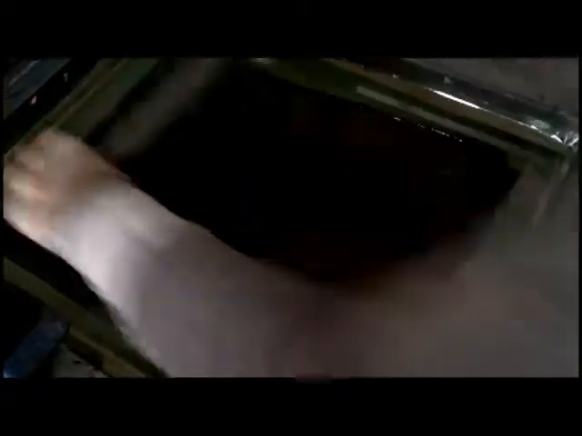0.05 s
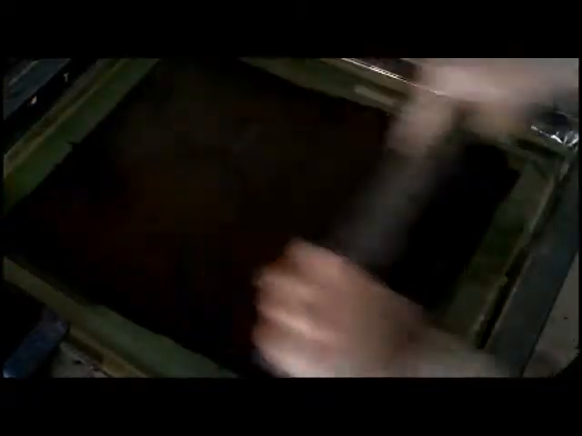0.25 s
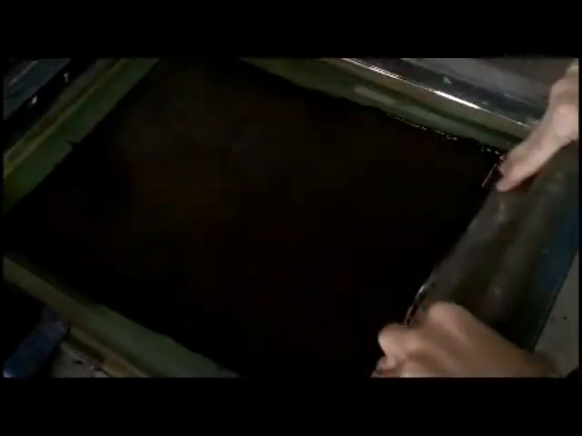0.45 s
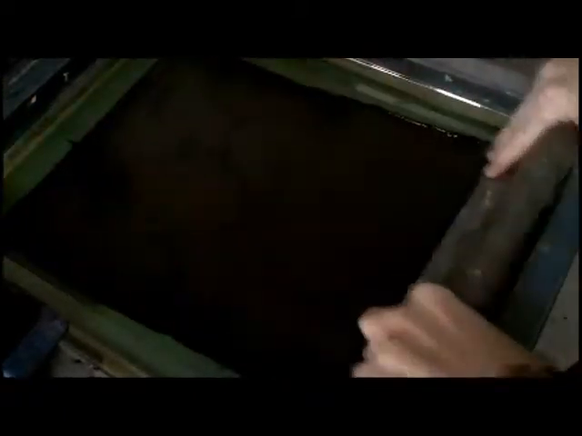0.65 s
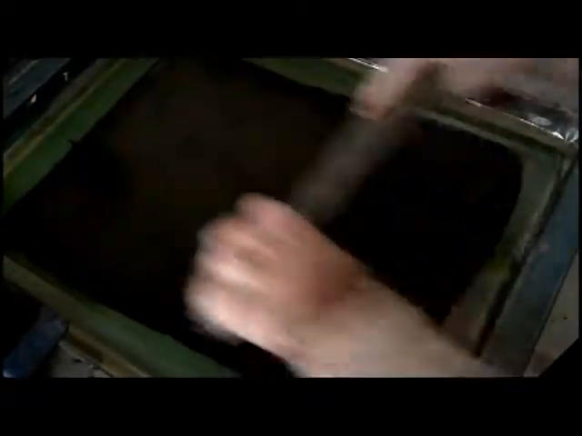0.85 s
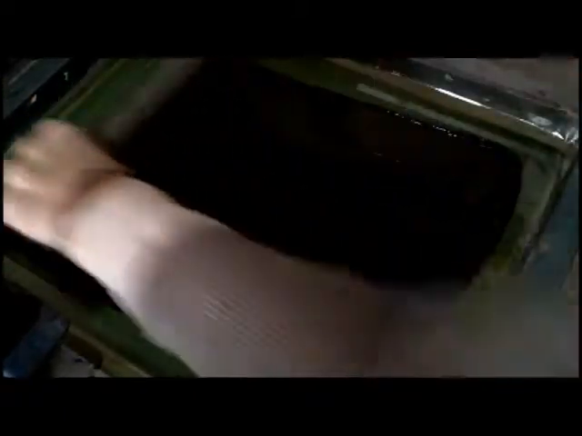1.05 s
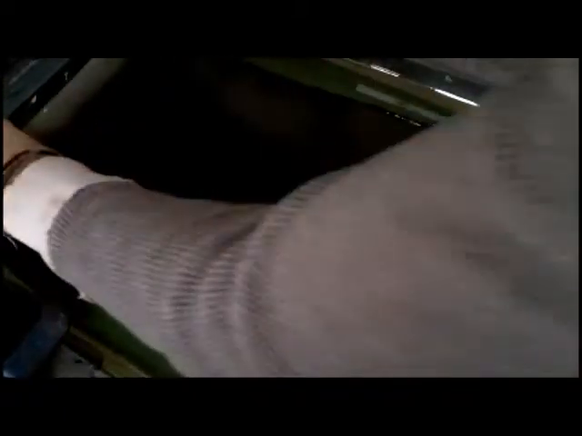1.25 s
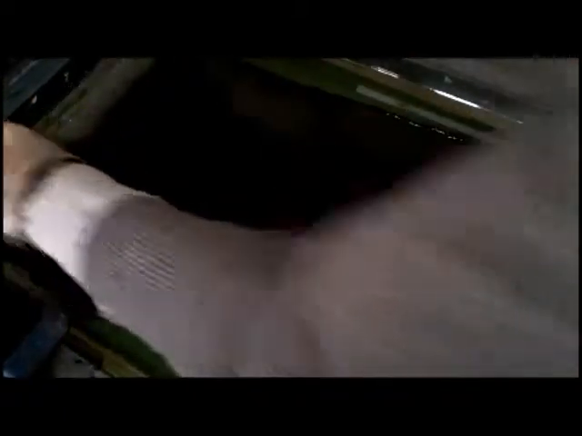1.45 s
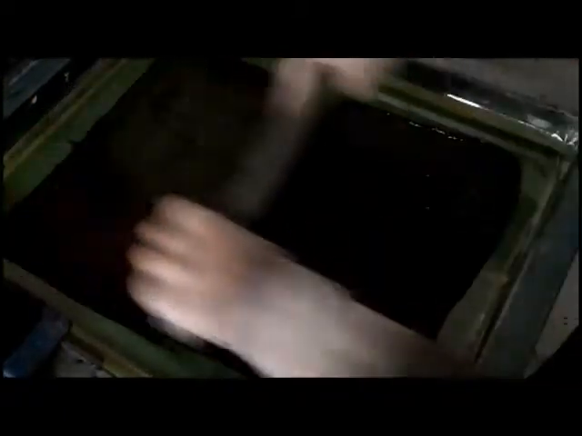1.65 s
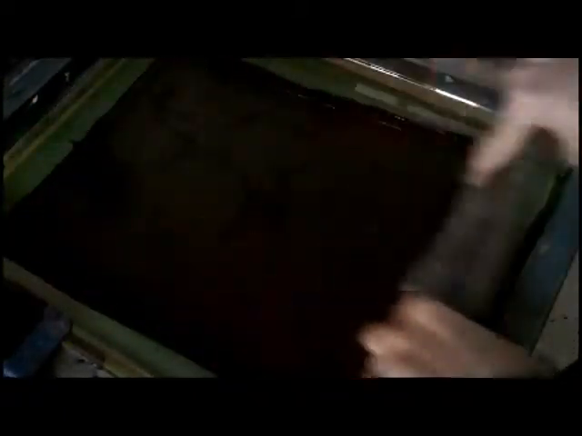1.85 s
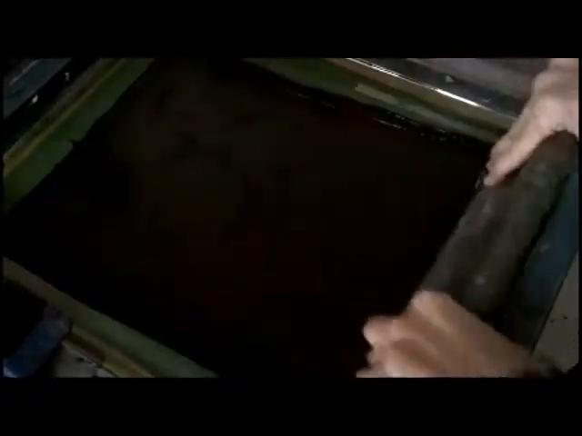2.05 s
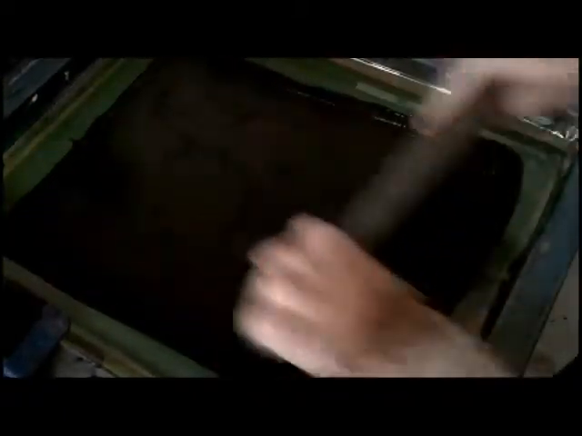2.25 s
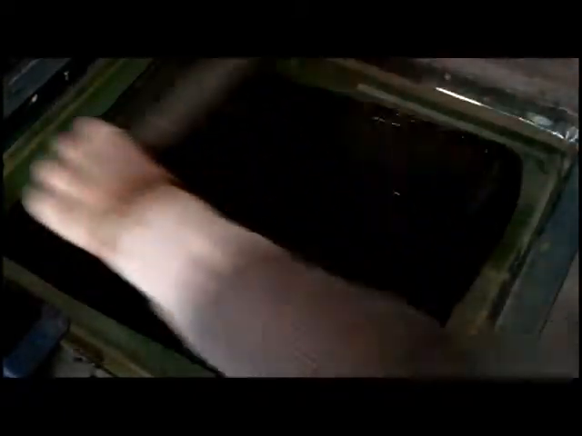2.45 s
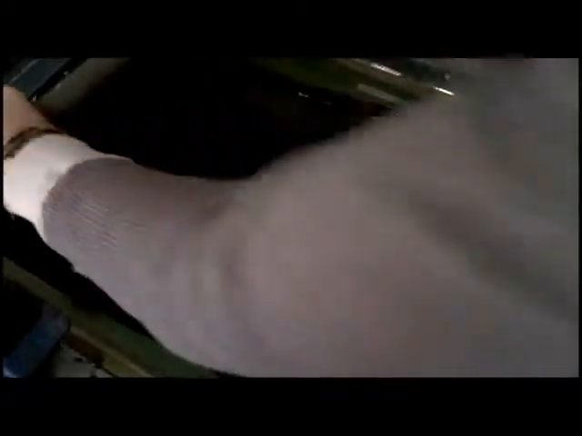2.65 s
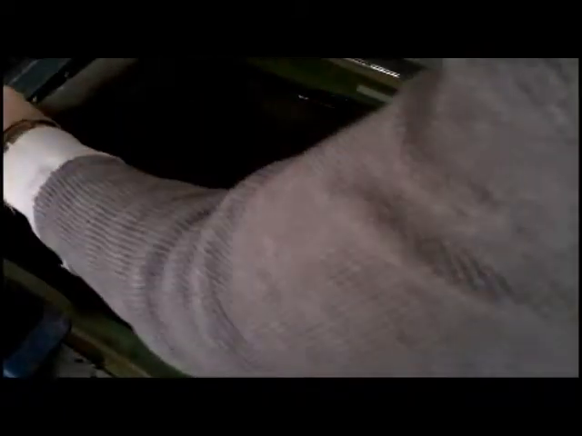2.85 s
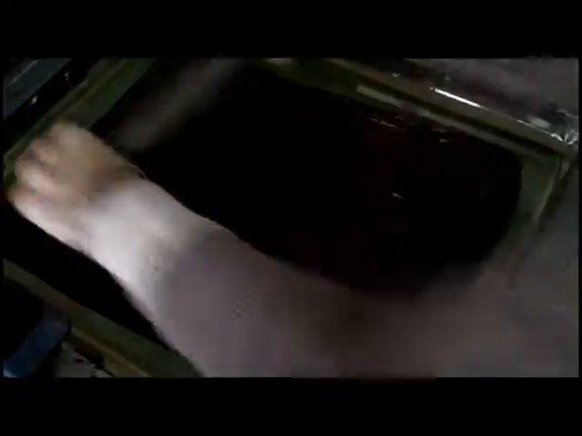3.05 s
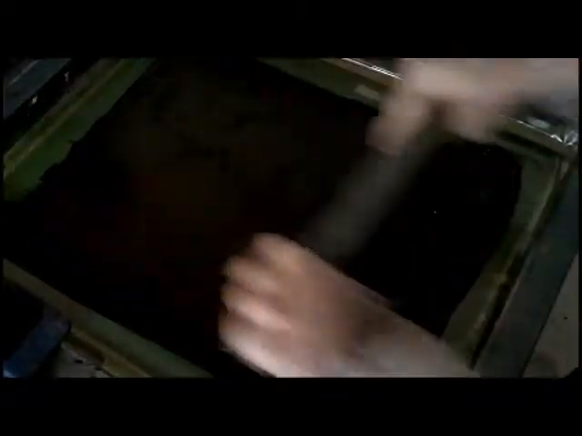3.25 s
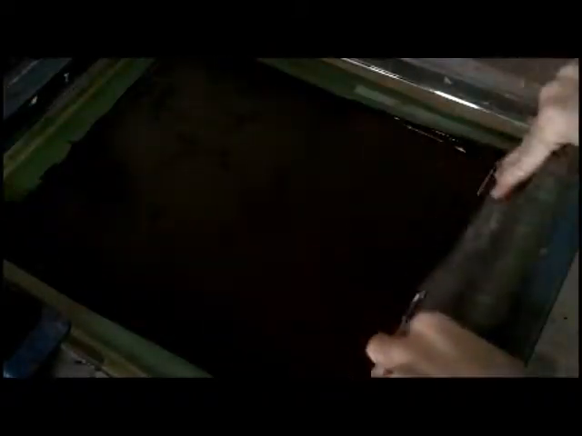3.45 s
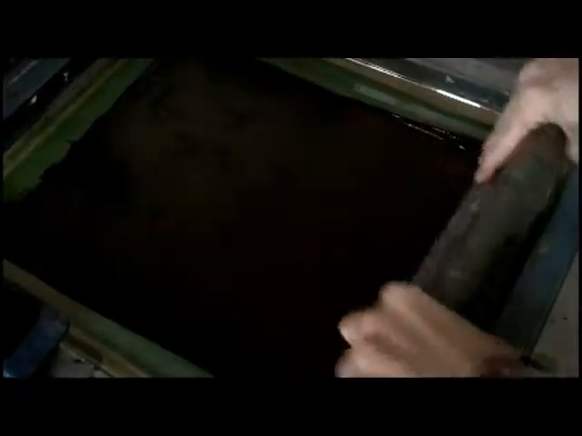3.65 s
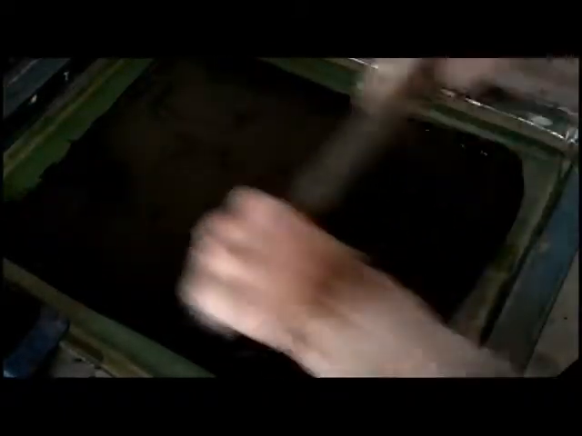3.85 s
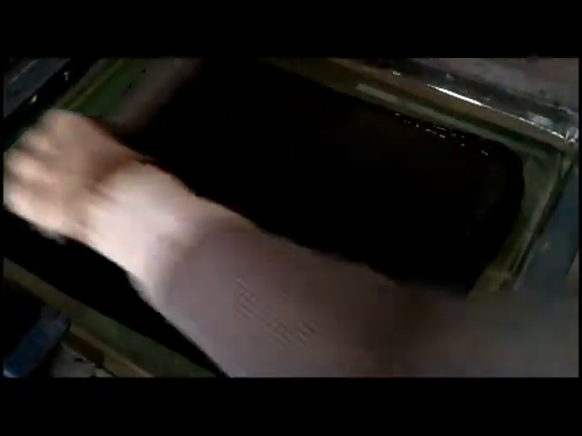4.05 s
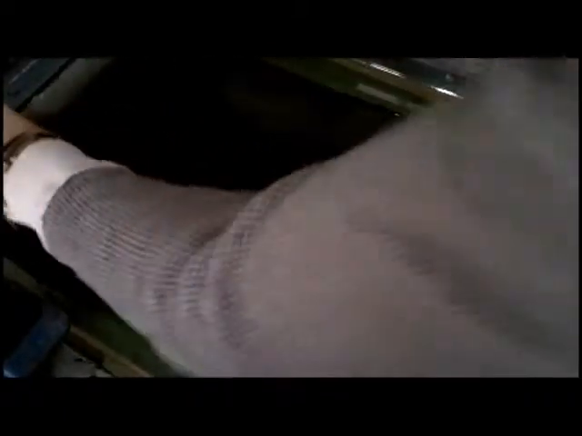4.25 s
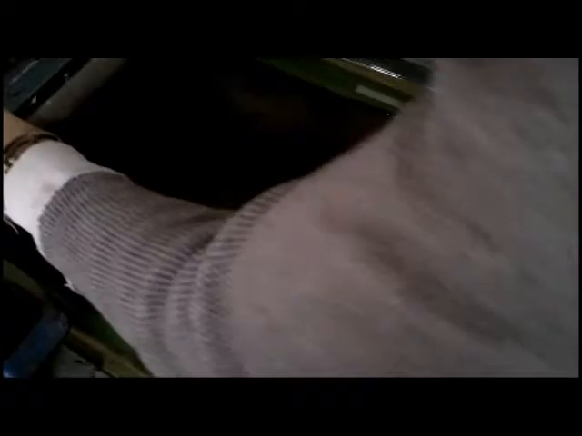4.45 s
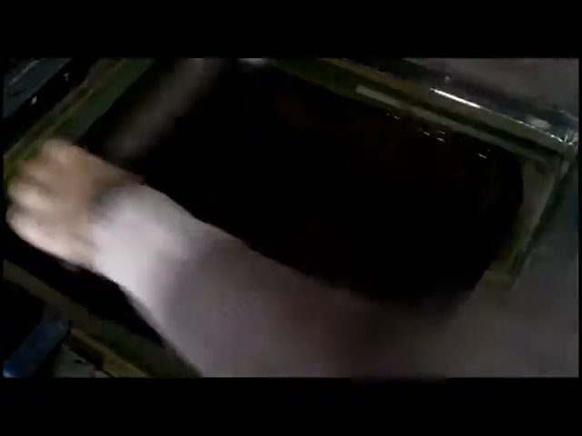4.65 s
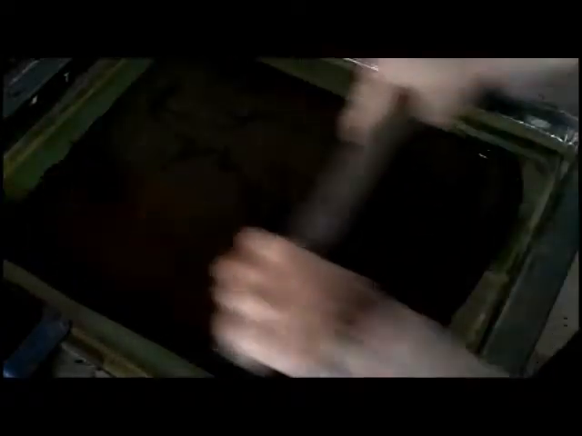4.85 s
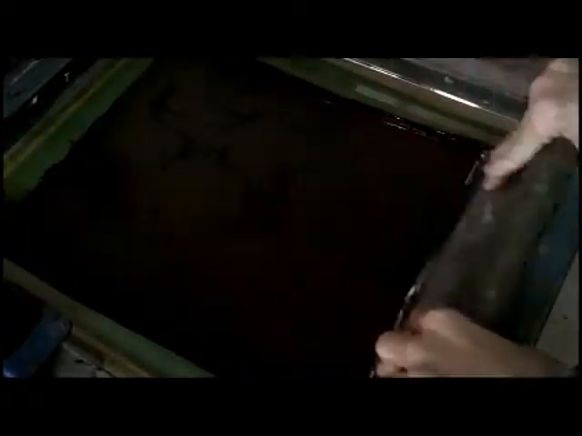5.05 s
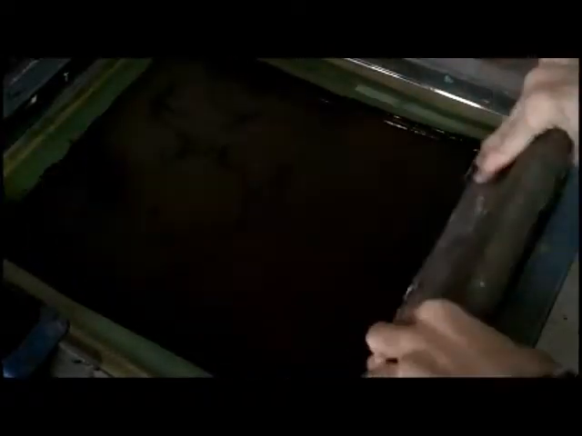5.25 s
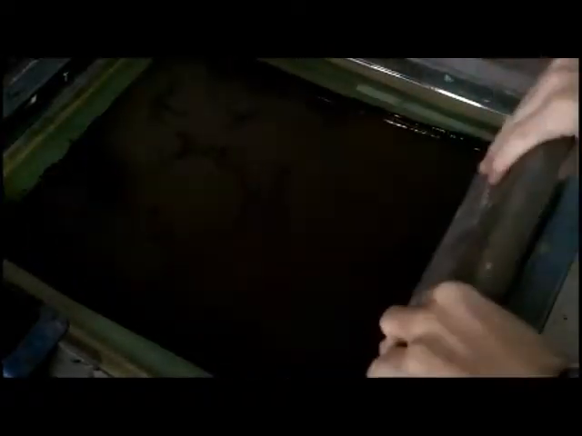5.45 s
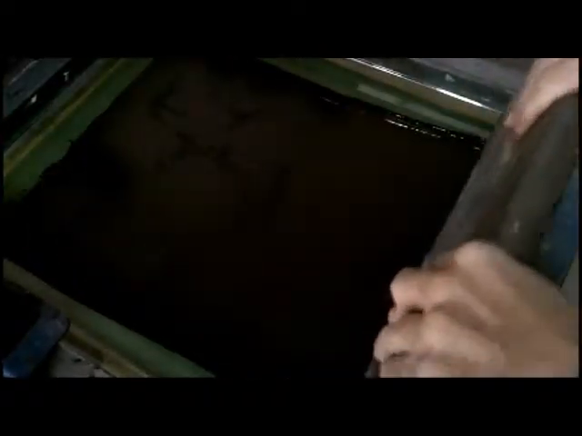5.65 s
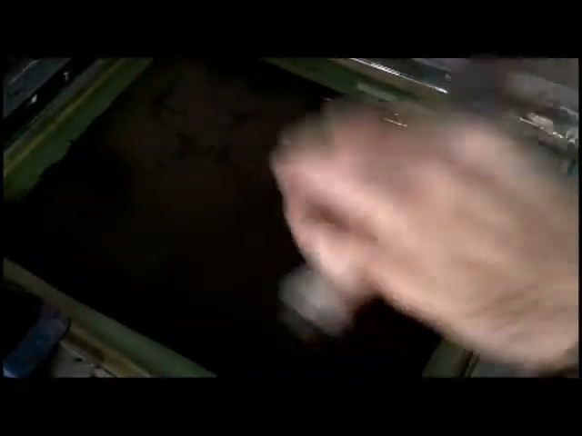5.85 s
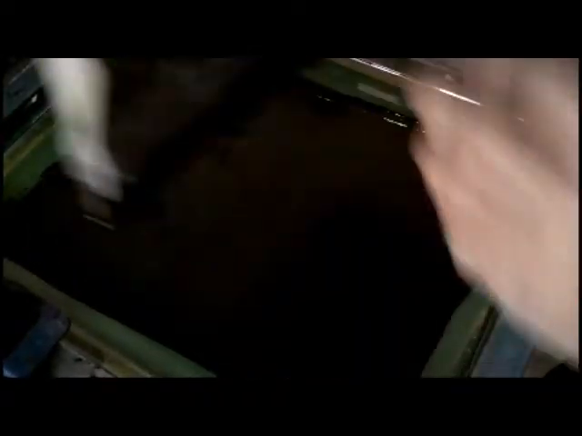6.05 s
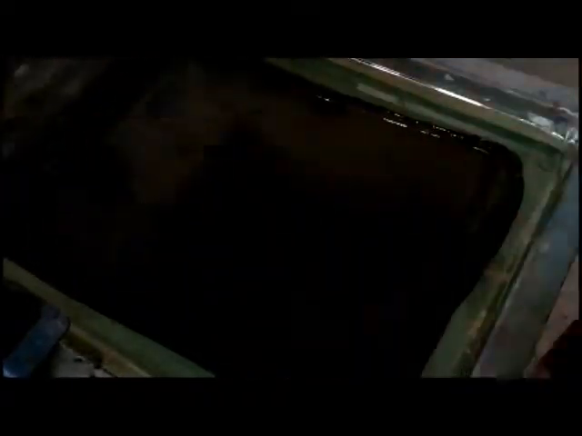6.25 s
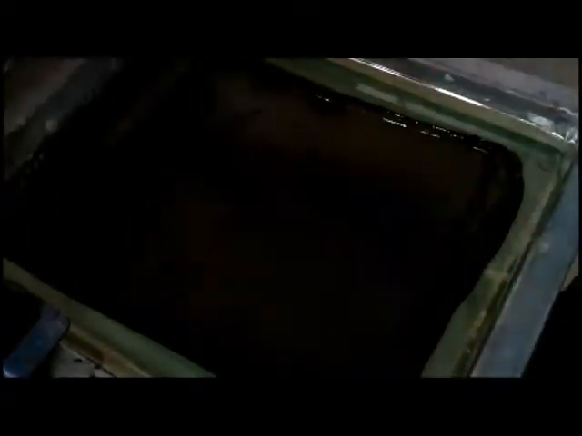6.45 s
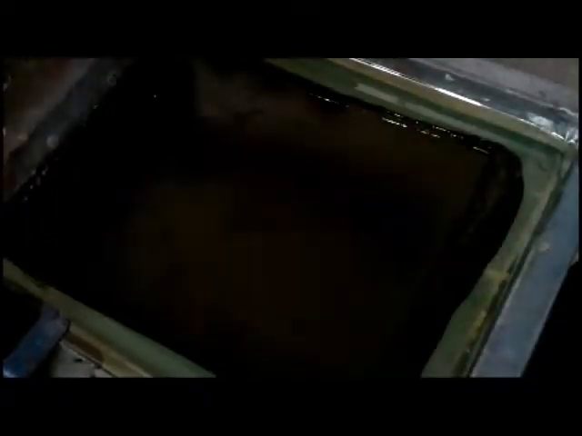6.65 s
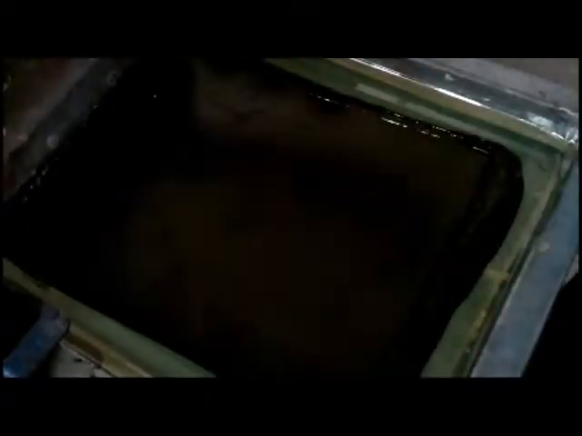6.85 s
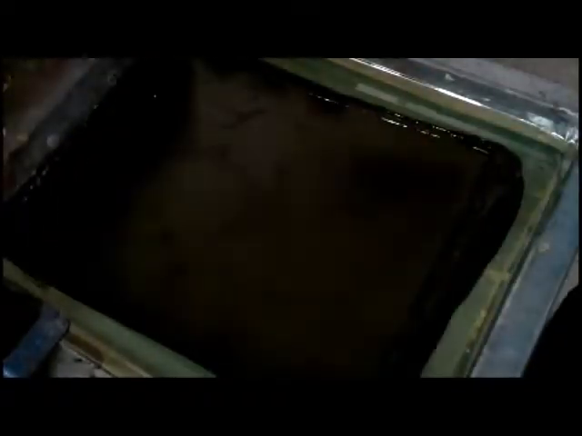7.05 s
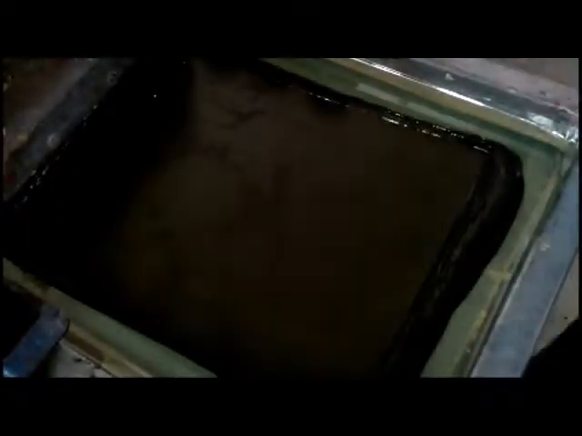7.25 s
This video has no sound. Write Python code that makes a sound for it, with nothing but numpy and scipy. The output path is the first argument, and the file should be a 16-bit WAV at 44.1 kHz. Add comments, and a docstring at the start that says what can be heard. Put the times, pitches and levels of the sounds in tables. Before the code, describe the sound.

Right at the start a rubber squeegee knocks on a wooden frame and is pulled across a taut mesh screen for half a second. It makes a high, zipping whistle that glides up and back down over a gritty scrape and a low drumming of the mesh. Three more pulls follow at about 1.5, 3.0 and 4.6 seconds. Each starts with a knock, and each is preceded by a hollow thump as the blade lands, at about 1.3, 2.8 and 4.4 seconds. In the gaps, sticky ink ticks and pops faintly and hands brush the screen. After 5.2 seconds only light rubbing and small ticks remain. A softer knock comes at 6.7 seconds and a very faint, short squeak at 7.2. Everything is close, with slight room echo and a low, steady hum throughout.

```python
"""A rubber squeegee lands on a printing screen, knocks the wooden frame and is pulled across the mesh.
The blade ticks over the threads so fast that it sings a gliding whistle over a scrape; the taut mesh drums.
Sticky ink then ticks and pops, and hands brush the screen. Three more pulls follow at 1.5, 3.0 and 4.6 s,
each after a knock. The blade lands again at 6.7 s and slips briefly at 7.2 s. The room hums throughout."""
import sys
import numpy as np
from scipy import signal
from scipy.fft import rfft, irfft, next_fast_len
from scipy.io import wavfile
from scipy.ndimage import uniform_filter1d, map_coordinates

SR = 44100
rng = np.random.default_rng(int(sys.argv[2]) if len(sys.argv) > 2 else 0)


def generate_wav(signal):
    """Clip the signal to [-1, 1] and save it as 16-bit WAV at the path in sys.argv[1]."""
    frames = np.transpose(np.atleast_2d(signal))
    scaled = np.clip(frames, -1, 1) * 32767
    pcm = np.round(scaled).astype(np.int16)
    wavfile.write(sys.argv[1], SR, pcm)


N = 322429

# blade path, one list per pull, the slip last: time_s, thread_rate_hz, skew_ratio, whistle_db, weave_db
PULLS = [
    [(.055, 1115, 0.04, -30, -50), (.09, 3550, .03, -27, -34.5), (.115, 5110, 0.01, -22, -42),
     (.15, 6790, 0.06, -19, -39.5), (.2, 8840, 0.01, -23.5, -33), (.24, 9600, .04, -16.5, -32),
     (.285, 10430, 0.06, -24, -37.5), (.375, 10000, 0.07, -15, -35), (.405, 8080, 0.03, -19, -43),
     (.443, 4604, 0.01, -28, -45), (.46, 3743, 0.06, -28, -46), (.48, 3760, 0.1, -27.5, -54),
     (.495, 3973, 0.01, -23, -50), (.512, 2996, 0.03, -32.5, -51), (.545, 815, .02, -51, -60)],
    [(1.515, 1203, .1, -46, -52), (1.55, 2300, .05, -45, -56), (1.585, 4196, .03, -34.5, -46),
     (1.62, 5570, 0.03, -26, -46), (1.655, 7440, 0.05, -29.5, -35), (1.76, 9560, .03, -25.5, -37),
     (1.8, 9870, 0.06, -28, -38), (1.84, 9350, 0.01, -32, -36.5), (1.87, 9790, 0.02, -29, -37.5),
     (1.9, 8506, .08, -27, -44), (1.93, 7254, .1, -37, -42), (1.965, 5590, 0.04, -31, -42),
     (2.0, 3286, 0.01, -39, -50), (2.03, 1506, 0.05, -54, -43)],
    [(3.025, 1005, .05, -45, -56), (3.065, 3640, 0, -32.5, -40), (3.09, 4800, 0.03, -24, -42),
     (3.12, 5730, 0.03, -34, -37), (3.17, 6350, 0.01, -26, -42.5), (3.25, 8340, 0.11, -28.5, -35),
     (3.3, 8550, .11, -23, -39.5), (3.34, 8570, 0.15, -31, -38), (3.39, 9360, 0.12, -23, -40),
     (3.44, 7010, 0.11, -30, -47), (3.48, 5400, 0.04, -30, -40), (3.505, 3365, 0.04, -44, -45.5),
     (3.55, 2400, 0.12, -46, -54), (3.585, 900, .05, -49, -54)],
    [(4.625, 894, .05, -32, -55), (4.64, 2218, 0, -27.5, -46), (4.66, 3820, 0.05, -24.5, -35),
     (4.717, 4905, 0, -19.5, -41), (4.73, 5200, 0.02, -24, -40), (4.77, 7055, 0.04, -28.5, -48),
     (4.82, 6750, 0, -18.5, -46), (4.86, 7750, 0.01, -27, -44), (4.905, 8600, 0.11, -22, -36.5),
     (4.95, 7575, 0.03, -33, -37.5), (5.01, 8510, .05, -26.5, -43), (5.05, 7645, 0.03, -34, -43),
     (5.09, 7700, 0.01, -27, -48), (5.12, 4513, .02, -29, -47), (5.145, 1800, 0.03, -58, -62)],
    [(7.245, 3710, .04, -62.5, -80), (7.27, 3880, .06, -53, -75), (7.31, 3800, 0.04, -59, -77)],
]
# whistle overtones: thread_rate_multiple, relative_db
OVERTONES = [(1.5, -9.5), (2, -9)]
# blade pressure per pull: start_s, stop_s, scrape_db, drum_db, hiss_db
GRIPS = [(.055, 0.508, -38.5, -41.5, -36.5), (1.54, 1.976, -42, -43, -37), (3.028, 3.524, -42, -45, -38),
         (4.625, 5.115, -41, -43.5, -37), (7.245, 7.29, -59, -62, -51.5)]
# decay after a pull: scrape_t60_s, drum_t60_s, hiss_t60_s
RELEASE_T60_S = (0.29, 0.48, 0.21)
# blade landings: start_s, scrape_db, drum_db, sway_db, shudder_db
LANDINGS = [(.056, -50, -31.5, -59, -40), (1.301, -48, -35.5, -38, -33.5), (1.54, -52, -38, -62, -41),
            (2.782, -57, -34, -28, -46), (3.03, -43, -33, -57, -43), (4.357, -56, -38.5, -31, -44),
            (4.627, -43, -31.5, -60, -40), (6.693, -62, -44.5, -44, -40)]
# decay after a landing: scrape_t60_s, drum_t60_s, hiss_t60_s, sway_t60_s
LANDING_T60_S = (.4, .5, .4, 0.46)
# light touches of hands, sleeves and blade: centre_s, length_s, scrape_db, drum_db, sway_db
BRUSHES = [(0.674, .08, -58.5, -61, -49), (0.769, 0.088, -59, -51.5, -58), (0.848, 0.073, -77, -66, -44.5),
           (1.038, .2, -69, -58, -54), (2.076, .08, -74, -50, -65), (2.151, .07, -53.5, -54, -65),
           (2.254, 0.42, -57.5, -51.5, -52), (2.518, 0.036, -59.5, -55, -67), (2.864, .12, -59, -46.5, -52),
           (3.694, 0.076, -59.5, -58, -55), (3.788, 0.13, -60, -47, -60), (3.957, 0.072, -69, -56.5, -54),
           (5.376, 0.2, -64, -52, -60), (5.476, 0.19, -52, -50.5, -57), (5.924, 0.13, -57.5, -65.5, -61),
           (6.64, 0.13, -72, -66, -62.5), (6.75, 0.057, -55.5, -53, -54), (6.837, 0.088, -63, -55, -62),
           (7.134, 0.19, -67.5, -64.5, -43), (7.26, 0.12, -72, -64, -54)]
# floor between touches: scrape_db, drum_db, hiss_db, sway_db
REST_DB = (-74.5, -63.5, -59.5, -64.5)
# noise spectra of scrape, hiss, table sway and room air: freq_hz, density_db
SCRAPE_SPECTRUM = [(500, -28), (800, 1.5), (1300, -6.5), (1800, 0), (3000, 3.5), (5600, 5.5), (6200, -40)]
HISS_SPECTRUM = [(5000, -34.5), (5800, 0), (8000, 1), (12000, 1)]
SWAY_SPECTRUM = [(10, -4.5), (25, 0.5), (50, -6.5), (90, -33)]
ROOM_SPECTRUM = [(12, -39.5), (20, 5.5), (71, -1), (92, -6.5), (124, 1.5), (154, -20), (208, 0),
                 (287, -24.5), (396, -14.5), (2400, -28.5), (3120, -77), (5280, -120)]
# resonances of the taut mesh and the wooden frame: freq_hz, width_hz, gain_db
MESH_MODES = [(162, 80, -4), (288.7, 53, 3.5), (403, 167, -7), (816, 990, -36)]
FRAME_MODES = [(40, 19, -9), (121.5, 23, -1), (181, 34.9, 2), (314, 102, 3.5), (407, 123, 1.5),
               (629, 180, -5.5), (1624, 600, -25.5)]
# blows on the frame: start_s, level_db, crack_relative_db
KNOCKS = [(0.052, -34, -4), (0.055, -27, -10), (0.992, -47.5, -6), (1.283, -36, -31), (1.3, -26.5, -37),
          (1.307, -35, -26), (1.311, -30, -30), (1.318, -25, -23), (1.378, -35.5, -12.5),
          (1.514, -35.5, -22), (1.542, -24.5, -19), (1.703, -32, -28), (1.715, -29, -28), (1.989, -43.5, 6),
          (2.741, -39, -18), (2.781, -21.5, -26), (2.794, -15.5, -28.5), (3.01, -36.5, -31),
          (3.025, -25, -31), (3.039, -24.5, -3.5), (4.339, -44.5, -5), (4.352, -30.5, -12),
          (4.36, -38, -20), (4.367, -21.5, -37), (4.624, -25, -8), (4.632, -18, -14.5), (6.69, -31.5, -21),
          (6.719, -37, -23)]
# ink letting go: start_s, level_db
INK_TICKS = [(0.7572, -48.5), (0.8579, -54), (1.0281, -50), (1.273, -48), (2.1156, -43), (2.5172, -45),
             (2.6409, -52), (2.7526, -46.5), (2.7656, -45), (2.8764, -47), (3.9514, -52.5), (4.5955, -52.5),
             (5.1731, -43), (5.3023, -61), (5.8621, -57), (6.0676, -61), (6.4852, -56.5), (6.6263, -56.5),
             (6.8144, -50), (7.1127, -59), (7.2489, -62)]
# air pockets in the ink: start_s, level_db, pitch_hz
INK_POPS = [(0.78, -47, 693), (1.993, -43.5, 621), (2.075, -53, 719), (2.167, -55, 680), (2.265, -56, 680),
            (3.79, -48, 643)]
# room decay: freq_hz, t60_s
WALL_DECAY = [(100, 0.41), (1000, 0.47), (4000, 0.37), (10000, .18)]
# room hum: pitch_hz, level_db
HUM_LINES = [(70.0, -70.5), (118.4, -74.5), (209.9, -89), (398.4, -81)]
# microphone colour: freq_hz, gain_db
MIC_RESPONSE = [(20, -13.5), (1000, -8.5), (2300, -6.5), (3000, -5), (3800, -1), (4600, 1.5), (4950, -1.5),
                (5150, -12.5), (6900, -20.5), (8300, -22), (10000, -21), (10700, -30), (11300, -23),
                (12000, -39.5)]
CODER_DIPS = [(2702, 700), (5520, 460), (7870, 1800), (10960, 590)]

ENDS_HZ = 3810  # below this thread rate only the blade's ends sing; above it the middle takes over
DRAG_HZ, SCRAPE_DB_PER_KHZ, DRUM_DB_PER_KHZ = 4020, -1, 1.03  # level slopes above this thread rate
BITE_S, HISS_BITE_S = .006, 0.028
LIGHT_HISS_DB = 3  # over the scrape, in landings and brushes
SHUDDER_T60_S, SHUDDER_CUTOFF_HZ = .3, 260
TREBLE_CUTOFF_HZ = 11930


def whistle():
    """The edge crosses threads at a rate set by its speed; the over-under weave adds half that rate."""
    out = np.zeros(N)
    for pull in PULLS:
        time_s, *columns = np.transpose(pull)
        span = np.arange(round(time_s[0] * SR), round(time_s[-1] * SR))
        curves = [uniform_filter1d(np.interp(span / SR, time_s, c), size=300) for c in columns]
        rate_hz, skew, whistle_db, weave_db = curves
        ends_share = np.clip((ENDS_HZ / rate_hz) ** 2.5, 0, 1)
        tone = np.sqrt(1 - ends_share) * fuzzy_tone(rate_hz, 300)
        tone += np.sqrt(ends_share) * blade_ends(rate_hz, skew)
        tone += sum(amp(db) * fuzzy_tone(multiple * rate_hz, 800) for multiple, db in OVERTONES)
        weave = blade_ends(rate_hz / 2, skew) + 2.6 * skew * fuzzy_tone(rate_hz / 2, 500, steady=0)
        fade = signal.windows.tukey(len(span), .03)
        out[span] += fade * (amp(whistle_db) * tone + amp(weave_db) * weave)
    return out


def blade_ends(hz, skew):
    """A skewed blade moves faster under one hand than the other, splitting the tone in two."""
    return (fuzzy_tone(hz * (1 - skew), 250) + fuzzy_tone(hz * (1 + skew), 250)) / np.sqrt(2)


def friction(scrape_gain, hiss_gain):
    """Rubber and hands on mesh: a gritty scrape and a fine hiss under an ever-changing grip."""
    grit = wobble(60) + 0.96 * wobble(300)
    scrape = scrape_gain * unit_rms(amp(2.6 * grit) * noise(SCRAPE_SPECTRUM))
    hiss = hiss_gain * unit_rms(amp(1.2 * grit) * noise(HISS_SPECTRUM))
    return scrape + hiss


def mesh_drum():
    """The rubbed mesh drones; the free part ahead of the blade shortens, so its note climbs."""
    rub = amp(2.0 * wobble(30)) * rng.standard_normal(N)
    drone = unit_rms(filtered(rub, resonances(MESH_MODES)))
    shortening = blade_travel() ** 2.2
    ahead = fuzzy_tone(330 + 400 * shortening, 520, steady=0)
    return np.sqrt(1 - 0.63 * shortening) * drone + 0.86 * np.sqrt(shortening) * ahead


def blade_travel():
    """Share of each pull's threads crossed so far, 0 to 1."""
    out = np.zeros(N)
    for pull in PULLS:
        time_s, rate_hz = np.transpose(pull)[:2]
        span = np.arange(round(time_s[0] * SR), round(time_s[-1] * SR))
        crossed = np.cumsum(np.interp(span / SR, time_s, rate_hz))
        out[span] = crossed / crossed[-1]
    return out


def contact_gains():
    """Gains of scrape, drum, hiss and sway: rest, pulls, landings and brushes add in power."""
    def column(*values):
        return np.array(values)[:, None]

    def touch_power(scrape_db, drum_db, sway_db):
        return amp(column(scrape_db, drum_db, scrape_db + LIGHT_HISS_DB, sway_db)) ** 2

    t = np.arange(N) / SR
    power = amp(column(*REST_DB)) ** 2 * np.ones(N)
    for pull, (start_s, stop_s, *levels_db) in zip(PULLS, GRIPS):
        time_s, rate_hz = np.transpose(pull)[:2]
        gain = amp(column(*levels_db) - 60 * np.maximum(t - stop_s, 0) / column(*RELEASE_T60_S))
        gain *= 1 - np.exp(-np.maximum(t - start_s, 0) / column(BITE_S, BITE_S, HISS_BITE_S))
        excess_khz = np.maximum(np.interp(t, time_s, rate_hz) - DRAG_HZ, 0) / 1000
        gain[:2] *= amp(column(SCRAPE_DB_PER_KHZ, DRUM_DB_PER_KHZ) * excess_khz)
        power[:3] += gain ** 2
    for start_s, *levels_db, _ in LANDINGS:
        decay = amp(-60 * np.abs(t - start_s) / column(*LANDING_T60_S))
        power += (t > start_s) * touch_power(*levels_db) * decay ** 2
    for centre_s, length_s, *levels_db in BRUSHES:
        power += np.exp(-(4 * (t - centre_s) / length_s) ** 2) * touch_power(*levels_db)
    return np.sqrt(power)


def frame_knocks():
    """A short push rings the frame; a crack and a brief rattle come with it."""
    blows, cracks = np.zeros((2, N + SR))
    t = np.arange(SR // 10) / SR
    push = t * np.exp(-t / 0.00055)
    for start_s, level_db, crack_db in KNOCKS:
        rattle = 0.0067 * rng.standard_normal(len(t)) * amp(-60 * t / 0.097)
        crack = rng.standard_normal(len(t)) * amp(-60 * t / 0.021)
        add_at(blows, start_s, -amp(level_db + 43.5) * (push / push.sum() + rattle))
        add_at(cracks, start_s, amp(level_db + crack_db + 10) * crack)
    return filtered(blows, resonances(FRAME_MODES)) + cracks[:N]


def frame_shudder():
    """The loose screen keeps the low frame modes going after a landing."""
    t = np.arange(N) / SR
    gain = sum((t > start_s) * amp(level_db - 60 * np.abs(t - start_s) / SHUDDER_T60_S)
               for start_s, *_, level_db in LANDINGS)
    frame = resonances(FRAME_MODES)
    shake = filtered(rng.standard_normal(N), lambda hz: frame(hz) / (1 + (hz / SHUDDER_CUTOFF_HZ) ** 4))
    return gain * unit_rms(shake)


def ink():
    """Sticky ink snaps in tiny dull ticks; trapped air pockets pop with rising pitch."""
    ticks, pops = np.zeros((2, N + SR))
    t = np.arange(SR // 20) / SR
    for start_s, level_db in INK_TICKS:
        add_at(ticks, start_s, amp(level_db + 11 - 60 * t / 0.02) * rng.standard_normal(len(t)))
    for start_s, level_db, pitch_hz in INK_POPS:
        envelope = amp(level_db + 16 - 60 * t / 0.048) * (1 - np.exp(-t / 0.0012))
        cycles = pitch_hz * (t + 7 * t * t)
        add_at(pops, start_s, envelope * np.sin(2 * np.pi * cycles))
    return filtered(ticks, lambda hz: 1 / (1 + 1j * hz / 6000)) + pops[:N]


def table_sway():
    """The table sways with a deep, uneven rumble."""
    return amp(3 * wobble(3.5)) * noise(SWAY_SPECTRUM)


def wall_echo(x):
    """Room reverberation; each frequency dies at its own speed."""
    hz, t, spectrum = signal.stft(rng.standard_normal(SR // 2), SR, nperseg=256)
    decay = amp(-60 * t / log_interp(WALL_DECAY, hz)[:, None])
    tail = signal.istft(spectrum * decay, SR, nperseg=256)[1]
    return signal.fftconvolve(np.pad(x, (200, 0)), tail / np.linalg.norm(tail))[:N]


def room_tone():
    """Low air noise, a thin hiss and wavering hum lines."""
    hum = sum(amp(db + 14) * fuzzy_tone(np.full(N, float(hz)), 5) for hz, db in HUM_LINES)
    air = amp(-52 + 1.5 * wobble(3.3)) * noise(ROOM_SPECTRUM)
    return air + amp(-64) * rng.standard_normal(N) + hum


def fuzzy_tone(hz, blur_hz, steady=1.25):
    """A tone of many parts that drift in and out of step at blur_hz."""
    drift = steady + wobble(blur_hz, len(hz)) + 1j * wobble(blur_hz, len(hz))
    waver = 1 + 0.00489 * wobble(45.1, len(hz))
    carrier = np.exp(2j * np.pi * np.cumsum(hz * waver) / SR)
    return np.real(unit_rms(drift) * carrier) * (hz < SR / 3)


def wobble(rate_hz, size=N):
    """Smooth random curve with knots at rate_hz."""
    knots = rng.standard_normal(int(size * rate_hz / SR) + 4)
    return map_coordinates(knots, [np.arange(size) * rate_hz / SR])


def noise(spectrum):
    """Noise of rms 1 shaped by (freq_hz, density_db) points."""
    points = spectrum + [(SR / 2, -120)]
    return unit_rms(filtered(rng.standard_normal(N), lambda hz: amp(log_interp(points, hz))))


def resonances(modes):
    """Frequency response of a body with these modes."""
    return lambda hz: sum(amp(db) * 1j * hz * width / (centre ** 2 - hz ** 2 + 1j * hz * width)
                          for centre, width, db in modes)


def minimum_phase(gain_db):
    """Response with these gains that does not ring before a hit."""
    cepstrum = irfft(gain_db * np.log(10) / 20)
    half = len(cepstrum) // 2
    cepstrum[1:half] *= 2
    cepstrum[half + 1:] = 0
    return np.exp(rfft(cepstrum))


def filtered(x, response):
    """x through a complex frequency response."""
    size = 2 * next_fast_len(N // 2 + SR // 4)
    return irfft(rfft(x, size) * response(np.fft.rfftfreq(size, 1 / SR)), size)[..., :N]


def log_interp(points, hz):
    """(freq_hz, value) points read on a log frequency axis."""
    freq_hz, values = np.transpose(points)
    return np.interp(np.log(hz + 1), np.log(freq_hz + 1), values)


def add_at(track, start_s, sound):
    track[round(start_s * SR):][:len(sound)] += sound


def unit_rms(x):
    return x / np.sqrt(np.mean(np.abs(x) ** 2) + 1e-20)


def amp(db):
    return 10 ** (np.asarray(db) / 20)


def scene():
    """The screen, its echo and the room, in mono."""
    screen = whistle() + frame_knocks() + ink()
    echo = amp(-13) * wall_echo(screen)
    scrape_gain, drum_gain, hiss_gain, sway_gain = contact_gains()
    rubbing = friction(scrape_gain, hiss_gain) + drum_gain * mesh_drum() + sway_gain * table_sway()
    return (screen + echo + rubbing + frame_shudder() + room_tone())[None]


def record(dry):
    def response(hz):
        colour = minimum_phase(log_interp(MIC_RESPONSE, hz))
        dips = [(centre ** 2 - hz ** 2) / (centre ** 2 - hz ** 2 + 1j * hz * width)
                for centre, width in CODER_DIPS]
        return colour * np.prod(dips, axis=0) * (hz < TREBLE_CUTOFF_HZ)

    return filtered(dry, response)


dry = scene()
out = record(dry)
generate_wav(out)
```